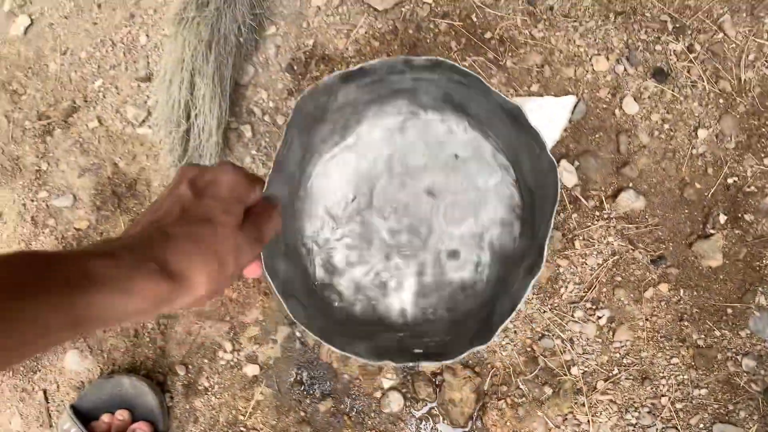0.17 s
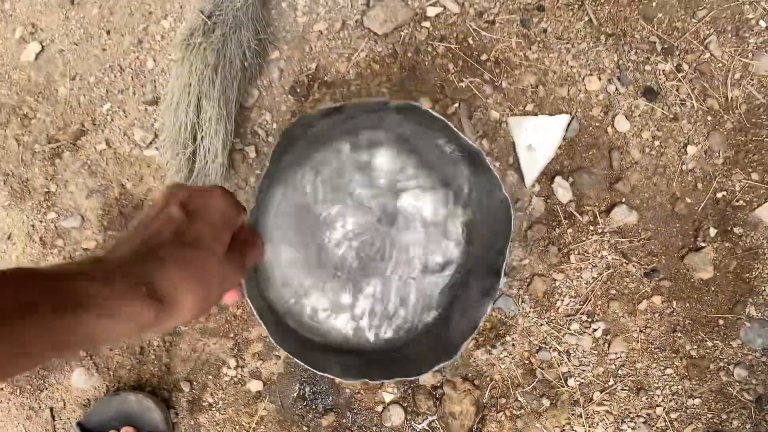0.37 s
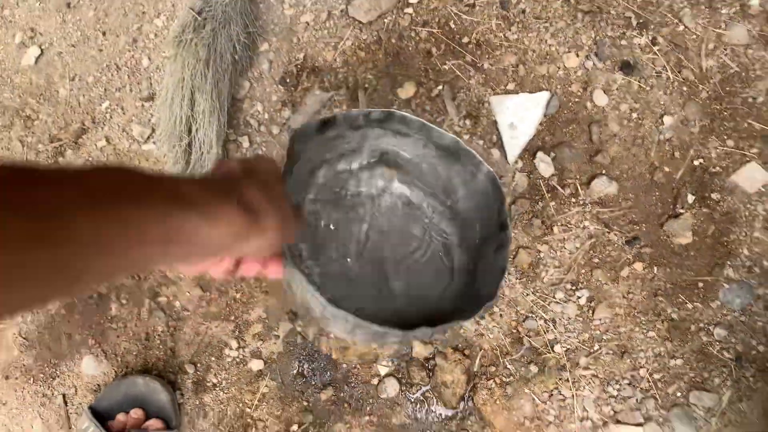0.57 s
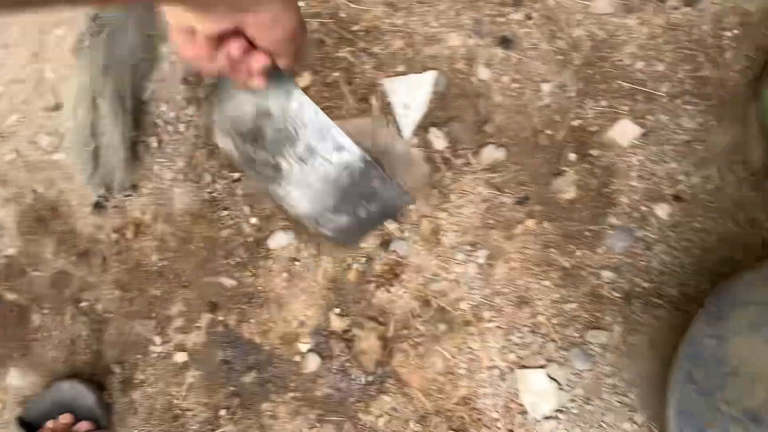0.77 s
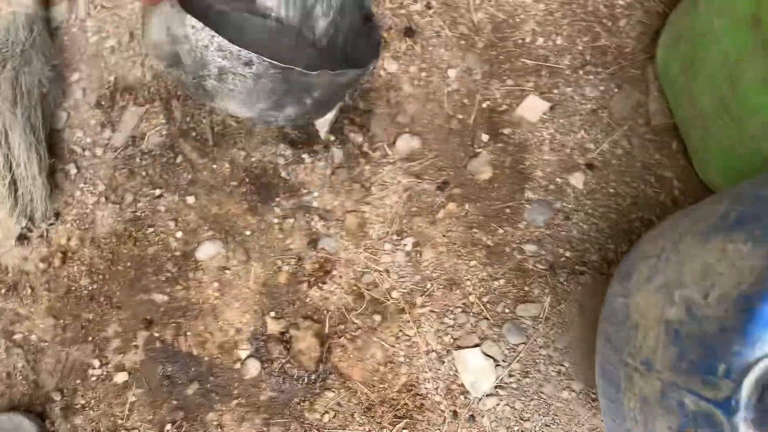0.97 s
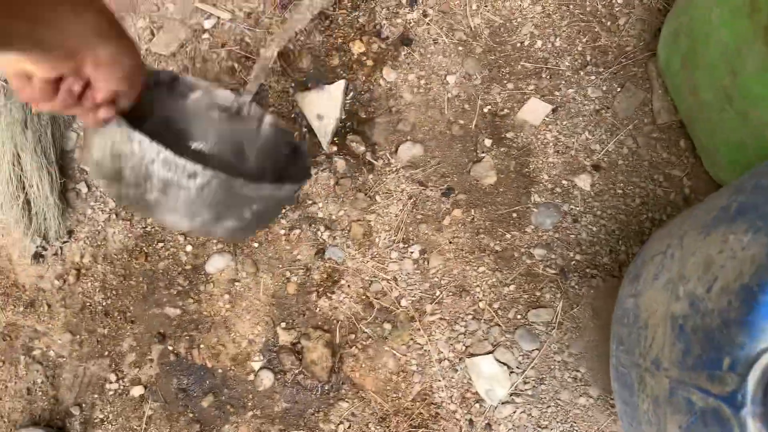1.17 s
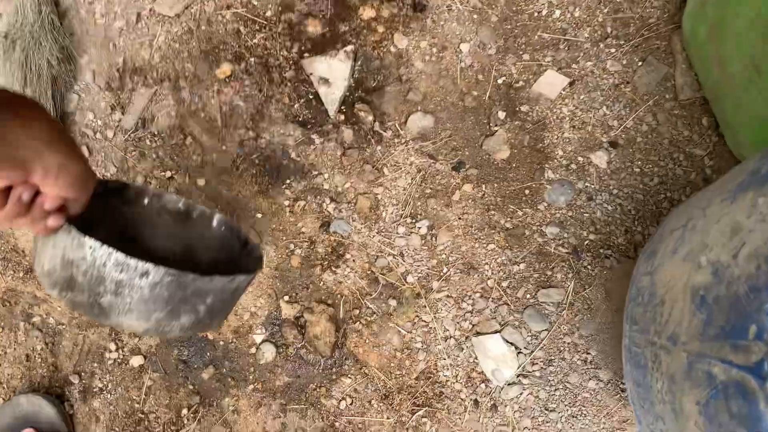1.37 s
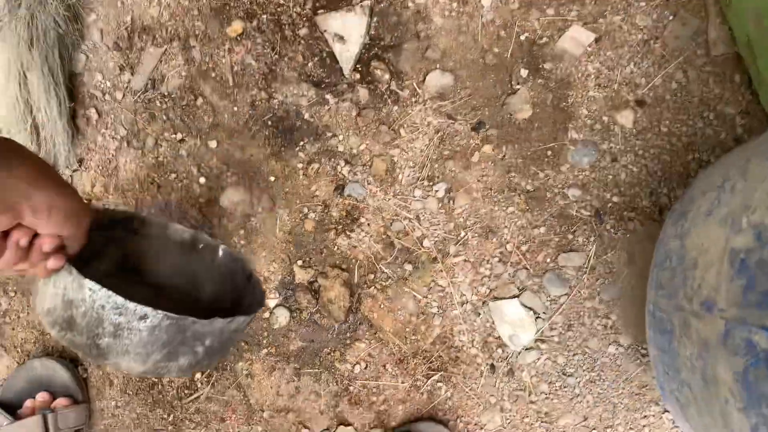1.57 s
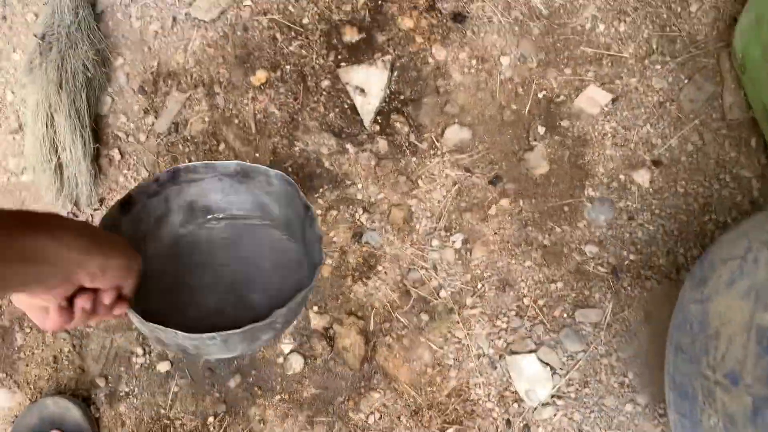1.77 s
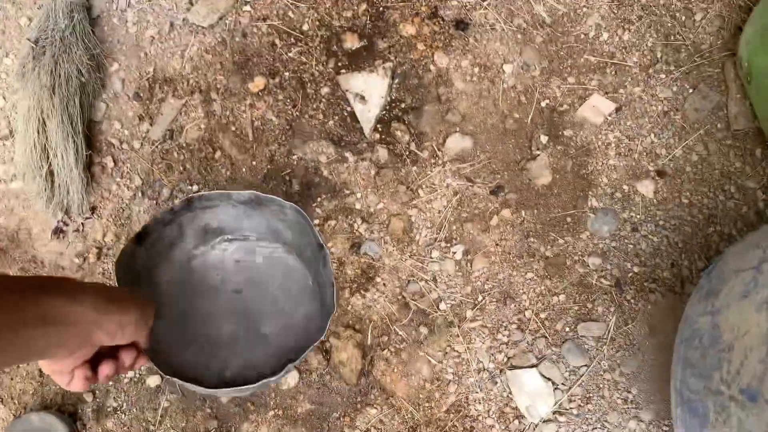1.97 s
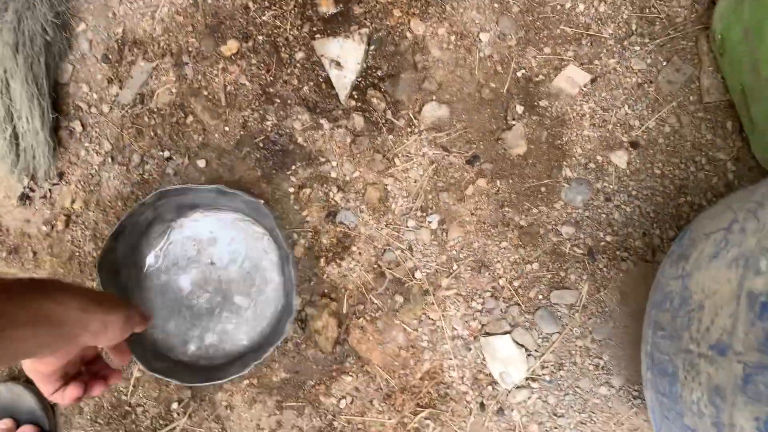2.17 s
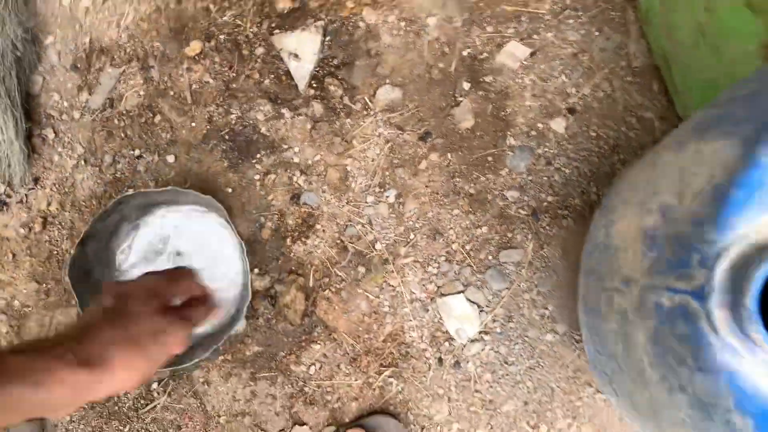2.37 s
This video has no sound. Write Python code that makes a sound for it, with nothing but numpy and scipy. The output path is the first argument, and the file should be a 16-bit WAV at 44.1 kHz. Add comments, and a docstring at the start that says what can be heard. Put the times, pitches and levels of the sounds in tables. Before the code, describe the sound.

Water swishes lightly round a thin metal bowl, close by outdoors, then is tossed out and spatters on dry dirt. The empty bowl is set down on stones with a loud, ringing clank and rocks briefly.

```python
"""Rinsing water swirled round a thin metal bowl, outdoors, close to a stereo microphone.
Drops tick and the wet bowl rings with a wandering pitch. Tossed out on to dry, stony dirt, the water
spatters and fizzes, and a last slug slaps down. After a faint scuff the empty bowl is set down: it
knocks, rocks and rings on the stones. A low rumble lies far off behind it all."""
import sys
import numpy as np
from scipy import signal
from scipy.fft import rfft, irfft
from scipy.io import wavfile

SR = 44100
rng = np.random.default_rng(int(sys.argv[2]) if len(sys.argv) > 2 else 0)


def output_pcm(signal):
    """Save a mono or channel-first signal as 16-bit PCM at the path in sys.argv[1].

    Samples are clipped to [-1, 1] before scaling.
    """
    pcm = np.clip(np.atleast_2d(signal).T, -1, 1) * 32767
    wavfile.write(sys.argv[1], SR, np.round(pcm).astype(np.int16))


N = 106413

# spectrum of the distant rumble: frequency_hz, gain_db
RUMBLE_SPECTRUM = [(25, -32), (47, -5), (75, 1), (135, -11), (260, -23.5), (430, -24.5), (1400, -40.5),
                   (4000, -53), (10000, -51.5), (16000, -58)]
# stereo width far from the microphone and close to it: frequency_hz, side_over_mid_db
FAR_WIDTH = [(60, -14), (1000, 4), (14000, -5)]
NEAR_WIDTH = [(200, -16), (800, -5.5), (2000, 2), (8000, 0.5), (12000, -17.5)]

# water washing round the bowl: time_s, wash_db, spray_db
SWIRL_LEVELS = [(0, -64, -62), (0.059, -72.5, -67.5), (.15, -63, -54.5), (0.231, -64.5, -60),
                (0.308, -60, -43.5), (.38, -55, -58.5), (.46, -60.5, -74), (0.5, -64.5, -60.5),
                (0.551, -66.5, -96), (0.798, -68, -85)]
# spectra of the wash and its fine spray: frequency_hz, gain_db
WASH_SPECTRUM = [(300, -19.5), (800, -3), (1400, 1), (2100, 5), (2700, -11.5), (5000, -39.5)]
WASH_SPRAY_SPECTRUM = [(3000, -1.5), (4800, -2), (8500, 0.5), (14000, -6)]
# pitch ranges of tiny bubbles, then droplets, in moving water: low_hz, high_hz
BLIP_RANGES = [(1000, 3000), (4800, 13000)]
# notes of the water-laden bowl: start_s, pitch_hz, glide_hz_per_s, level_db, t60_s
WET_NOTES = [(.002, 1247, -700, -48.5, 0.19), (0.112, 1054, 1098, -38.5, 0.16),
             (0.149, 1260, 1728, -56.5, 0.77), (.323, 2050, -200, -45, 0.33), (0.361, 960, 32, -55.5, 0.55),
             (.762, 908, 95, -49, 0.37), (.762, 1733, 1900, -43, 0.31), (.845, 1495, -2, -44.5, 0.18),
             (.95, 1450, -19, -68, 3), (1.04, 2900, 0, -71, 1.1)]
# single bubbles: start_s, pitch_hz, level_db, t60_s
PLOPS = [(0.109, 973, -39, .05), (0.269, 1784, -38, .04), (.34, 704, -41, .05), (.372, 1997, -38, .09),
         (.779, 753, -34.5, .05), (0.846, 2670, -28.5, .035), (0.948, 1428, -36.5, .04),
         (1.135, 3030, -44.5, .03), (1.164, 2270, -48, .04), (1.443, 3730, -26.5, 0.017)]
# drops ticking, then a faint scuff in the last row: start_s, level_db, pitch_hz, t60_s
TICKS_AND_SCUFF = [(.1095, -40.5, 4770, 0.039), (.133, -41, 8660, 0.003), (0.1511, -28, 10500, 0.017),
                   (0.1552, -27, 7300, 0.027), (.189, -50, 10500, .014), (0.204, -38.5, 9600, 0.0056),
                   (0.258, -38.5, 9600, 0.043), (.279, -34, 11200, 0.0079), (.369, -40, 7260, 0.05),
                   (.3805, -24, 10600, 0.011), (0.4183, -41.5, 11900, 0.043), (1.2753, -13, 9900, .012),
                   (1.44, -34, 9800, .02), (1.499, -44.5, 11000, 0.017), (1.969, -59, 8930, 0.28)]

# water landing and soaking in: time_s, patter_db, fizz_db
LANDING_LEVELS = [(.57, -96, -79.5), (.63, -94, -58.5), (.71, -61.5, -63.5), (.79, -57.5, -60.5),
                  (.86, -61, -45), (.965, -51, -41.5), (1.03, -66.5, -56), (1.15, -89.5, -63),
                  (1.24, -64, -51), (1.285, -65, -48), (1.44, -70, -51), (1.56, -87, -78.5)]
# spectra of the patter and the fizz: frequency_hz, gain_db
PATTER_SPECTRUM = [(900, -10.5), (2800, 6), (4500, -4.5), (7000, -5.5), (16000, -37)]
FIZZ_SPECTRUM = [(2000, -18.5), (4000, -12), (6500, -8.5), (10000, -2), (16000, -14.5)]
# slugs of water hitting the dirt: start_s, rise_s, t60_s, slap_db, spray_db
SLUGS = [(0.76, .003, 0.59, -45, -47), (.843, .003, 0.099, -47.5, -36.5), (1.25, 0.0056, 0.064, -39.5, -26),
         (1.254, 0.0029, 0.067, -34.5, -30), (1.272, .004, 0.072, -60, -27.5)]
# spectra of their slap and spray: frequency_hz, gain_db
SLAP_SPECTRUM = [(100, 8), (400, -1), (2200, 5), (3200, -7), (16000, -42.5)]
SLUG_SPRAY_SPECTRUM = [(800, -24.5), (5000, -6), (10000, 2), (14000, -10)]

# the bowl's modes: pitch_hz
BOWL_PITCHES = [291, 964, 1079, 1287, 1310, 1530, 1594, 1658, 1943, 2008, 2198, 2422, 2514, 2776, 3406,
                3848, 7430]
# each mode's decay, level by spot struck and position: t60_s, base_db, edge_db, far_edge_db, pan_db
BOWL_MODES = [(0.61, -35.5, -36, -53, -0.5), (0.25, -16, -17, -29.5, -0.5), (0.22, -45, -16, -26, 1),
              (0.33, -34, -31, -44, 19), (0.37, -18, -21.5, -56.5, 4.5), (0.058, -19, -16.5, -21.5, 2),
              (0.19, -53, -13, -42, 2.5), (0.32, -30, -27, -59, 1), (0.32, -40, -34, -52, -4),
              (0.27, -47, -27, -37.5, 9), (0.29, -18.5, -23, -32, 3), (0.24, -38, -29, -43, -6),
              (0.09, -35, -44, -28, -4), (0.095, -18, -45, -50, -1.5), (0.34, -30.5, -45, -49, 12),
              (0.068, -21.5, -47, -58, 15), (0.095, -17, -59, -60, -1)]
# where the bowl is struck, in the order of those columns: spot_name
BOWL_SPOTS = ["base", "edge", "far edge"]
# how far the ringing lags in the right channel: pitch_hz, lag_rad
RIGHT_LAG = [(1980, 0.73), (2240, -0.7)]
# the bowl meets the ground: start_s, spot_name, ring_db, rise_s, clatter_db, grit_db
GROUND_KNOCKS = [(2.1418, "base", -1, 0.0051, -21, -16), (2.1885, "edge", -9, 0.0012, -31, -24),
                 (2.194, "edge", -4.5, 0.002, -22.5, -17), (2.317, "far edge", -14.5, 0.019, -44, -47.5),
                 (2.356, "far edge", -16.5, 0.0052, -59, -36.5), (2.364, "far edge", 1.5, 0.0011, -31, -37),
                 (2.3757, "far edge", -15, 0.0012, -30.5, -19.5)]
# spectra of clattering metal and crunching grit: frequency_hz, gain_db
CLATTER_SPECTRUM = [(500, -2), (900, 7.5), (4200, 6.5), (8000, -4), (11000, -30.5)]
GRIT_SPECTRUM = [(120, -35), (1000, -26), (3000, -14), (6000, -4), (7500, 4), (10000, 4.5), (12000, -6),
                 (16000, -16)]
# the bowl's weight landing: start_s, pitch_hz, level_db, t60_s
WEIGHT_CLONKS = [(2.1432, 738, -2.5, 0.013), (2.145, 382, -22, 0.028), (2.1961, 1770, -8, 0.037),
                 (2.2, 307, -30.5, 0.021), (2.202, 146, -26.5, 0.058), (2.3645, 927, -13, 0.048)]

WATER_PAN_DB = 6  # left of the microphone
BUBBLE_GLIDE_PER_S, WATER_RISE_S = 2.95, .0015  # the glide is a share of the starting pitch
LN_1000 = np.log(1000)  # a decay of 60 dB
TIME_S, BIN_HZ = np.arange(N) / SR, np.arange(N // 2 + 1) * SR / N


def amp(db):
    """Decibels to gain."""
    return 10 ** (np.asarray(db) / 20)


def pan(db):
    """Channel gains with the left louder by db."""
    return amp(np.array([[db], [-db]]) / 2)


def gains(points):
    """Gain of each frequency bin from (Hz, dB) points."""
    hz, db = np.array(points).T
    return amp(np.interp(np.log(BIN_HZ + 1), np.log(hz), db))


def band(low_hz, high_hz):
    """A resonance with steep skirts, as (Hz, dB) points."""
    return [(low_hz / 10, -70), (low_hz / 2, -30), (low_hz, -3), (np.sqrt(low_hz * high_hz), 0),
            (high_hz, -3), (high_hz * 2, -30), (high_hz * 10, -70)]


def texture(points, scatter_db=0, width=NEAR_WIDTH, grains_per_s=3500):
    """Stereo noise with a unit-level middle; with scatter, a rain of tiny clicks of unequal size."""
    noise = rng.standard_normal((2, N))
    if scatter_db:
        clicks = np.sign(noise) * (rng.random(N) < grains_per_s / SR)
        noise = clicks * amp(scatter_db * np.minimum(rng.exponential(size=N), 6))
    spectrum = rfft(noise) * gains(points)
    mid, side = irfft(spectrum[0], N), irfft(spectrum[1] * gains(width), N)
    return np.array([mid + side, mid - side]) / mid.std()


def wander(rate_hz):
    """Smooth random motion of unit spread."""
    motion = irfft(rfft(rng.standard_normal(N)) * np.exp(-(BIN_HZ / rate_hz) ** 2), N)
    return motion / motion.std()


def strike(start, rise, t60):
    """Envelope that swells to its peak at the start time and then dies away."""
    age = TIME_S - start
    exponent = np.where(age < 0, 2 * age / rise, -LN_1000 * age / t60)
    return np.exp(np.maximum(exponent, -60))


def ring(start, hz, t60, glide_hz_per_s=0, lag_rad=0):
    """A dying, possibly gliding tone."""
    out, first = np.zeros(N), int(start * SR)
    age = np.arange(min(N - first, int(2 * t60 * SR))) / SR
    phase = 2 * np.pi * (hz + glide_hz_per_s * age / 2) * age - lag_rad
    out[first:first + len(age)] = np.exp(-LN_1000 * age / t60) * np.sin(phase)
    return out


def flow(table, spectra, blip_db, blips_per_s=(90, 300), t60_cycles=26):
    """Two layers of water grains: tiny bubbles chirp in the first, droplets in the second."""
    time_s, *levels = np.array(table).T
    span_s = time_s[-1] - time_s[0]
    out = np.zeros((2, N))
    layers = zip(levels, spectra, BLIP_RANGES, blips_per_s, blip_db)
    for level_db, spectrum, (low_hz, high_hz), per_s, over_db in layers:
        out += amp(np.interp(TIME_S, time_s, level_db, right=-120)) * texture(spectrum, scatter_db=3)
        for when, pitch, loudness, side in rng.random((N // 20, 4))[:int(per_s * span_s)]:
            start = time_s[0] + when * span_s
            hz = low_hz * (high_hz / low_hz) ** pitch
            scatter_db = 4 * min(-np.log(1 - loudness), 2)
            db = np.interp(start, time_s, level_db) + over_db + scatter_db
            first, age = int(start * SR), np.arange(int(t60_cycles / hz * SR)) / SR
            phase = 2 * np.pi * hz * age * (1 + BUBBLE_GLIDE_PER_S * age / 2)
            chirp = np.exp(-LN_1000 * age * hz / t60_cycles) * np.sin(phase)
            out[:, first:first + len(age)] += amp(db) * pan(2 * side * WATER_PAN_DB) * chirp
    return out


def distant_rumble(level_db=-48):
    """A steady low rumble, far from the microphone."""
    return amp(level_db) * texture(RUMBLE_SPECTRUM, width=FAR_WIDTH)


def swirl():
    """Water washes round the bowl and throws up a fine spray."""
    return flow(SWIRL_LEVELS, (WASH_SPECTRUM, WASH_SPRAY_SPECTRUM), blip_db=(1, 5))


def stirred_bowl(over_wash_db=-1, bend_share=.026):
    """The washing water keeps the bowl's middle modes sounding, bent by its shifting weight."""
    time_s, wash_db, _ = np.array(SWIRL_LEVELS).T
    bent_time = np.cumsum(1 + bend_share * wander(rate_hz=1.7)) / SR
    notes = sum(wander(rate_hz=6.3) * np.sin(2 * np.pi * hz * bent_time) for hz in BOWL_PITCHES[1:11])
    envelope = amp(over_wash_db + np.interp(TIME_S, time_s, wash_db, right=-120))
    return envelope * pan(WATER_PAN_DB) * notes / notes.std()


def wet_bowl(waver_rad=.6):
    """Single notes of the bowl glide and waver as water runs over the metal."""
    out = np.zeros(N)
    for start, hz, glide_hz_per_s, db, t60 in WET_NOTES:
        age = TIME_S - start
        phase = 2 * np.pi * (hz + glide_hz_per_s * age / 2) * age + waver_rad * wander(rate_hz=22)
        out += amp(db) * strike(start, WATER_RISE_S, t60) * np.sin(phase)
    return pan(WATER_PAN_DB) * out


def bubbles(splash_db=-14):
    """Each bubble opens with a small splash and chirps upwards."""
    out = np.zeros((2, N))
    for start, hz, db, t60 in PLOPS:
        fade_in = np.clip((TIME_S - start) / WATER_RISE_S, 0, 1)
        chirp = fade_in * ring(start, hz, t60, hz * BUBBLE_GLIDE_PER_S)
        splash = strike(start, WATER_RISE_S, t60) * texture(band(hz / 1.44, hz * 1.26))
        out += amp(db) * (chirp + amp(splash_db) * splash)
    return pan(WATER_PAN_DB) * out


def drops_and_scuff(rise_s=.0002, edge_ratio=1.0808):
    """Bright, narrow-band noise: drops tick, then a faint scuff just before the bowl is set down."""
    return sum(amp(db) * strike(start, rise_s, t60) * texture(band(hz / edge_ratio, hz * edge_ratio))
               for start, db, hz, t60 in TICKS_AND_SCUFF)


def landing_water():
    """The tossed water patters on the dry dirt and fizzes as it soaks in."""
    return flow(LANDING_LEVELS, (PATTER_SPECTRUM, FIZZ_SPECTRUM), blip_db=(3, -3))


def splats():
    """Each slug of water hits the ground with a wet slap and a burst of spray."""
    slap = pan(WATER_PAN_DB) * texture(SLAP_SPECTRUM, scatter_db=3)
    spray = texture(SLUG_SPRAY_SPECTRUM, scatter_db=3)
    return sum(strike(start, rise, t60) * (amp(slap_db) * slap + amp(spray_db) * spray)
               for start, rise, t60, slap_db, spray_db in SLUGS)


def knocked_bowl(sag_hz=15.5, chatter_depth=.28):
    """Each knock rings the bowl's modes as its spot allows, roughened by the rim chattering on stones."""
    out = np.zeros((2, N))
    for hz, (t60, *spot_db, pan_db) in zip(BOWL_PITCHES, BOWL_MODES):
        lag = np.interp(hz, *np.array(RIGHT_LAG).T)
        mode = np.zeros((2, N))
        for start, spot, ring_db, *_ in GROUND_KNOCKS:
            pitch_hz = hz - sag_hz * (spot == "far edge")  # lower as the bowl settles on that edge
            tone = np.array([ring(start, pitch_hz, t60), ring(start, pitch_hz, t60, lag_rad=lag)])
            mode += amp(ring_db + spot_db[BOWL_SPOTS.index(spot)]) * tone
        out += pan(pan_db) * mode * (1 + chatter_depth * wander(rate_hz=80))
    return out


def clatter_and_grit():
    """At each knock the metal clatters and grit crunches under it."""
    clatter, grit = texture(CLATTER_SPECTRUM), texture(GRIT_SPECTRUM, scatter_db=.98)
    out = np.zeros((2, N))
    for start, _, _, rise, clatter_db, grit_db in GROUND_KNOCKS:
        out += amp(clatter_db) * clatter * strike(start, 2 * rise, t60=.11)
        out += amp(grit_db) * grit * strike(start, rise, t60=.038)
    return out


def clonks(rise_cycles=1.8, right_lag_s=.00017):
    """Pressed on the ground by its own weight, the bowl flexes only briefly."""
    arrival = TIME_S - np.array([[0], [right_lag_s]])
    return sum(amp(db) * strike(start, rise_cycles / hz, t60) * np.sin(2 * np.pi * hz * (arrival - start))
               for start, hz, db, t60 in WEIGHT_CLONKS)


def reflections(near, level_db=-18.5, t60=.3):
    """Faint scatter reaches the microphone from the ground and things nearby."""
    age = TIME_S[:SR // 2]
    tail = rng.standard_normal((2, len(age))) * np.exp(-LN_1000 * age / t60) * (age > .005)
    tail /= np.sqrt(np.sum(tail[0] ** 2))
    return amp(level_db) * signal.fftconvolve(near, tail, axes=1)[:, :N]


def scene(low_cut_hz=87):
    """Water and bowl close to the microphone, the rumble far off."""
    set_down = knocked_bowl() + clatter_and_grit() + clonks()
    rinse = drops_and_scuff() + bubbles() + wet_bowl() + stirred_bowl()
    rinse += splats() + swirl() + landing_water()
    low_cut = signal.butter(2, low_cut_hz, "high", fs=SR, output="sos")  # small things radiate little bass
    near = signal.sosfilt(low_cut, rinse + set_down)
    return near + reflections(near) + distant_rumble()


def record(dry, top_hz=16000):
    """The recorder rounds the highest peaks and cuts the top."""
    rounded = dry / (1 + dry ** 4) ** (1 / 4)
    return signal.sosfilt(signal.ellip(8, .2, 80, top_hz, fs=SR, output="sos"), rounded)


dry = scene()
out = record(dry)
output_pcm(out)
```